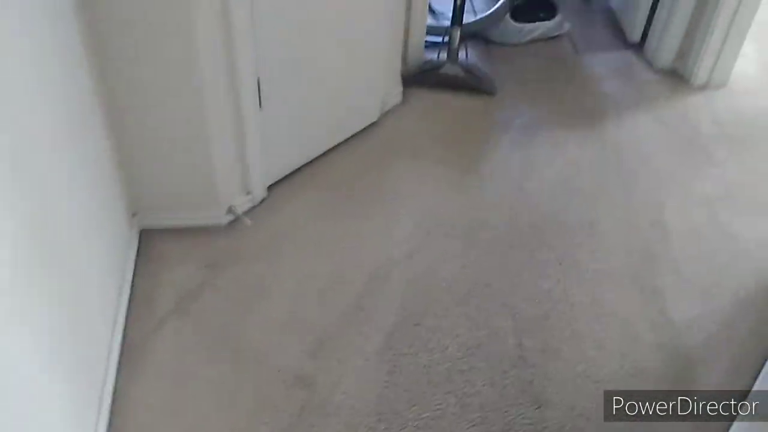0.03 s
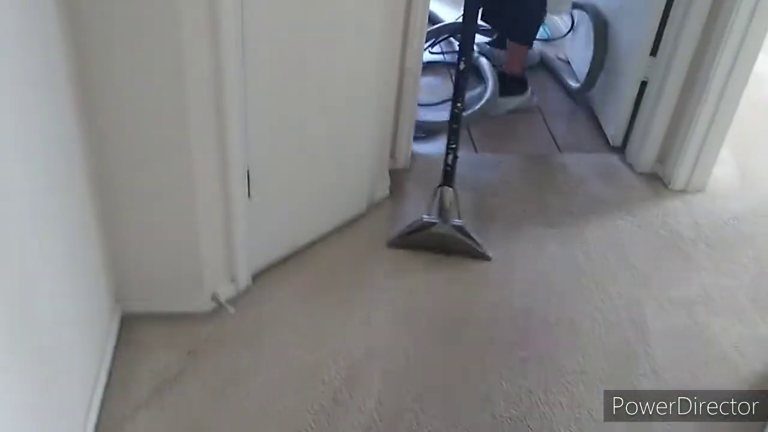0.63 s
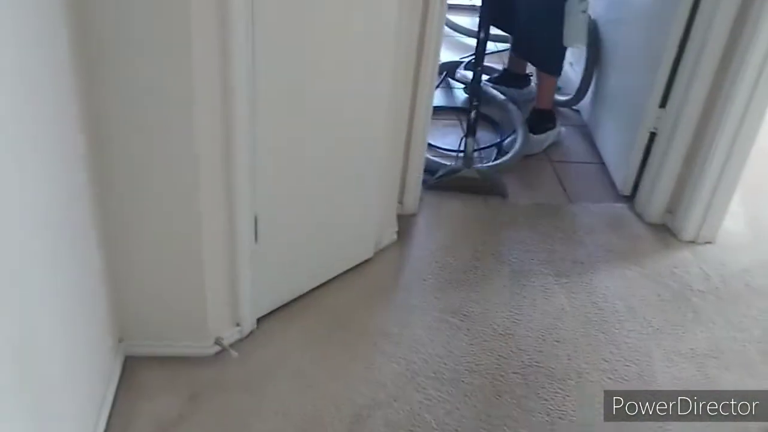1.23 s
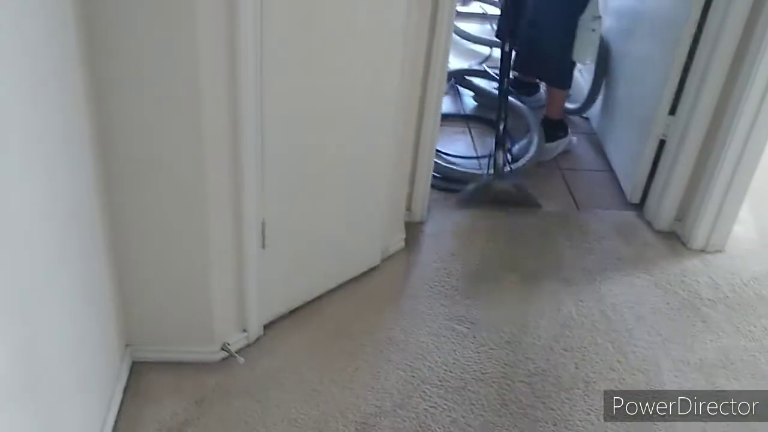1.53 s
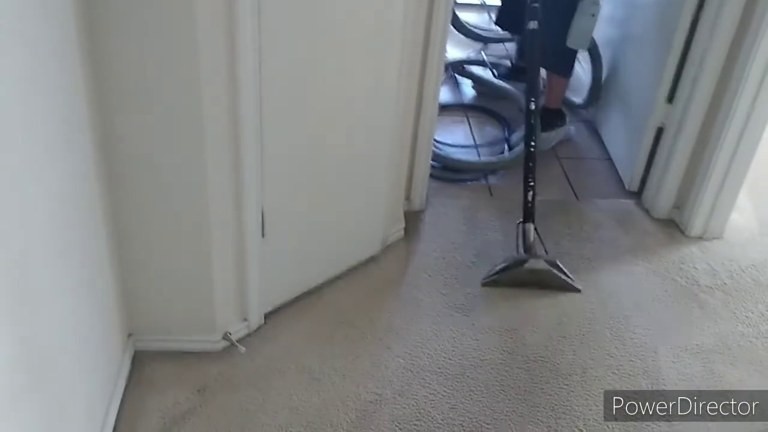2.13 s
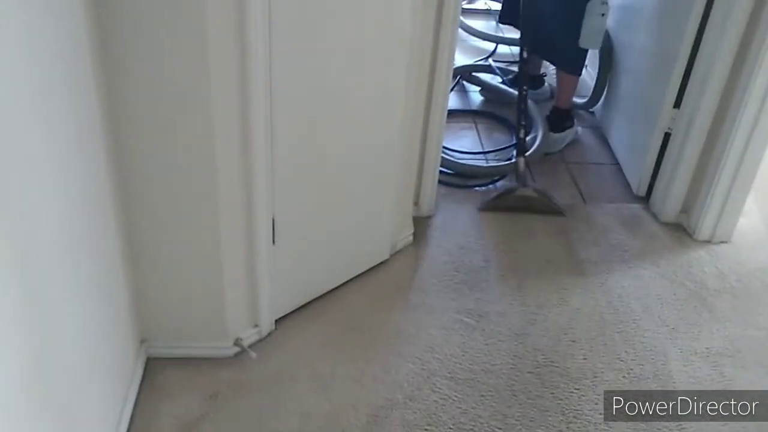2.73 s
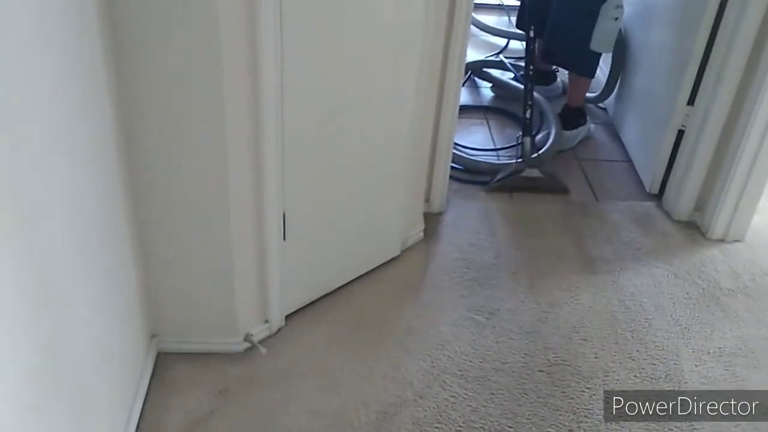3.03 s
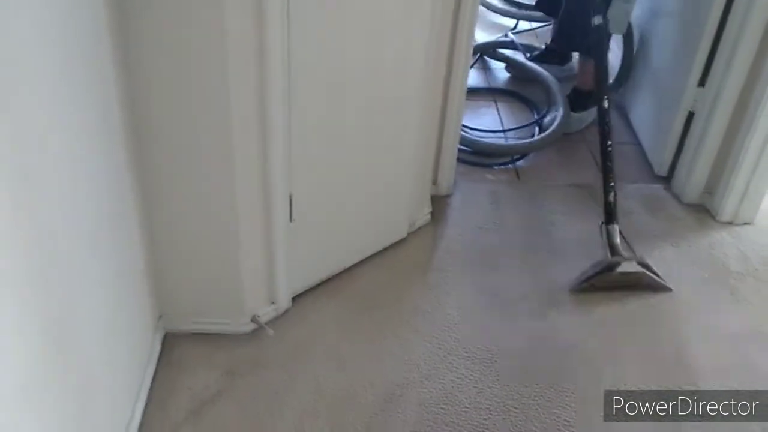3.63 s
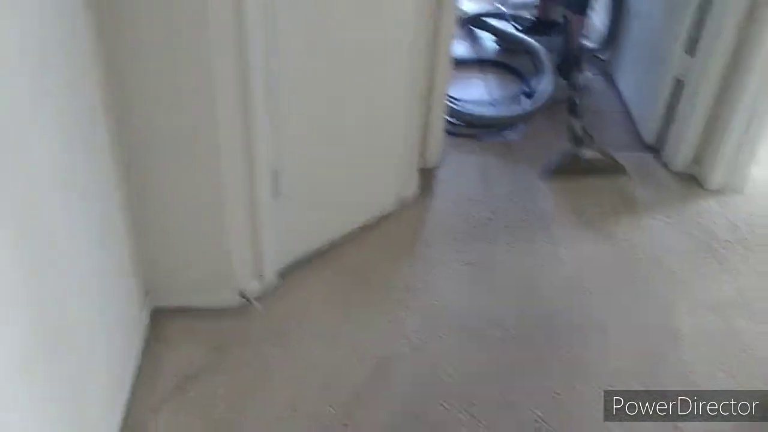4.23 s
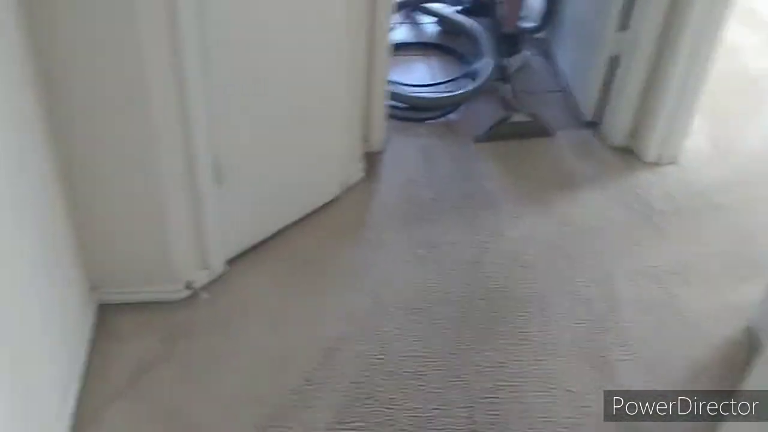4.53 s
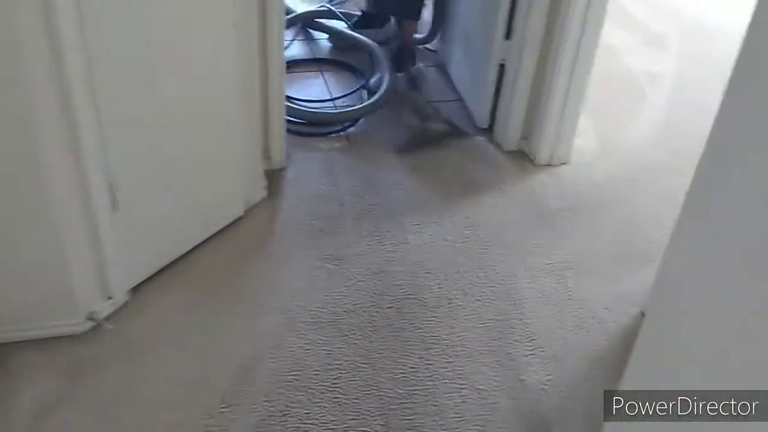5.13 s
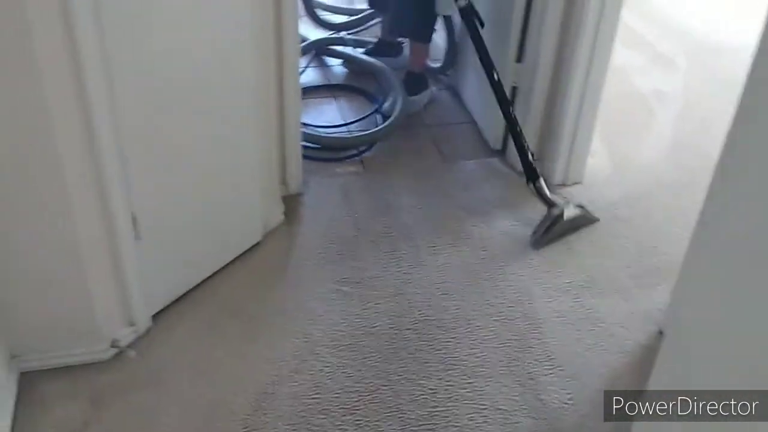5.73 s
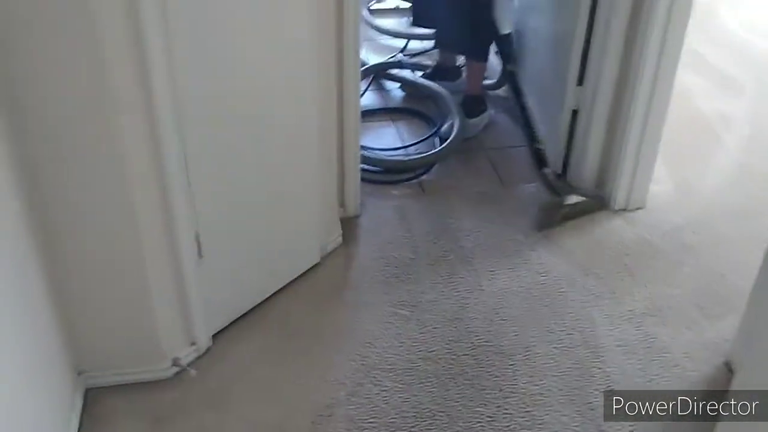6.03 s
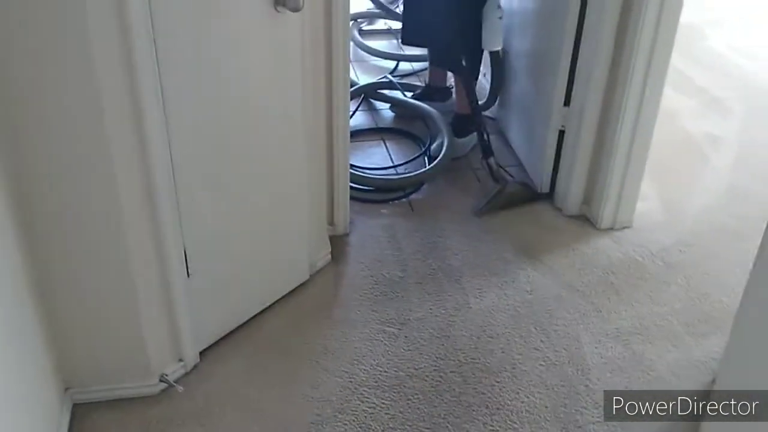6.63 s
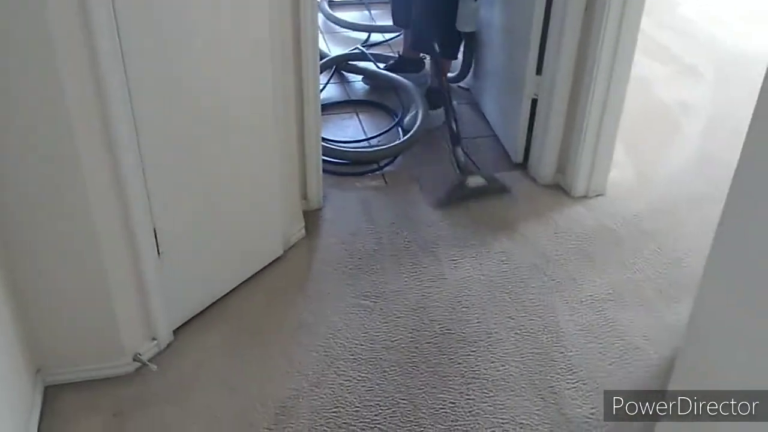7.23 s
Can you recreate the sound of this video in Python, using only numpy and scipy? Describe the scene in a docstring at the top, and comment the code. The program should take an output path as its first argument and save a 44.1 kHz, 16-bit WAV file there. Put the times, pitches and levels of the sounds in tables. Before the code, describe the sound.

Continuous rushing, hissing suction comes from a carpet cleaning wand working along an indoor hallway, with a wavering high whistle on top and a rapid low pump throb behind. Several long, smooth hissing pulls alternate with looser, sputtering air. As the strokes turn, the head scrubs wet pile, gives soft knocks and slurps water up the tube, most strongly at about one, three, five and seven seconds.

```python
"""A carpet extractor wand is pushed and pulled over a hallway carpet, heard in mono.
Air rushes and whistles into its slot, and hisses when the slot's lips seal on the pile (the fibres).
As a stroke turns, the wand scrubs wet pile, knocks, and gulps air and water, which gurgles in the tube.
Behind it, the machine's pump throbs about twenty times a second through the hose."""
import sys
import numpy as np
from scipy import signal
from scipy.fft import rfft, irfft, next_fast_len
from scipy.io import wavfile
from scipy.ndimage import map_coordinates

SR = 44100
rng = np.random.default_rng(int(sys.argv[2]) if len(sys.argv) > 2 else 0)


def wrap_up_sound(samples):
    """Save the sound to the file named by the first command line argument, as 16-bit audio."""
    columns = np.atleast_2d(samples).T
    # keep every value between -1 and 1, then stretch to whole-number steps
    tamed = np.clip(columns, -1, 1)
    steps = np.round(tamed * 32767).astype(np.int16)
    wavfile.write(sys.argv[1], SR, steps)


N = 325017

# The pump's throb. Each row: time in seconds, relative levels of the boom and the drone in dB.
PUMP_LEVELS = [(0.0, -31, -21.5), (0.08, -23.5, -27.5), (0.2, -34.5, -23), (0.37, -39, -31),
               (0.49, -28, -24.5), (0.7, -31.5, -31.5), (0.93, -38, -28), (1.06, -24.5, -28),
               (1.2, -30, -23), (1.4, -31, -31), (1.7, -32, -25.5), (2.03, -30.5, -29.5),
               (2.36, -29.5, -32.5), (2.46, -33, -27), (2.79, -36, -32), (3.04, -28, -23),
               (3.16, -23, -31.5), (3.3, -29.5, -27), (3.55, -20.5, -29.5), (3.75, -28, -29),
               (4.1, -27.5, -23.5), (4.33, -28, -25), (4.78, -25.5, -38), (4.99, -29.5, -28),
               (5.11, -39, -52), (5.4, -35, -53.5), (5.46, -33.5, -45), (5.62, -50, -39.5),
               (5.8, -44.5, -38.5), (6.08, -43.5, -36.5), (6.22, -41, -31), (6.3, -52, -33),
               (6.4, -48, -42), (6.52, -42, -43), (6.74, -51.5, -50), (6.81, -61, -39), (6.92, -60, -34),
               (6.98, -24.5, -28.5), (7.27, -47, -45), (7.37, -49, -42.5)]
# The pump's pace. Each row: time in seconds, strokes per second.
PUMP_SPEED = [(0, 20.42), (2.0, 20.45), (2.6, 20.5), (3.1, 20.36), (4.3, 20.38), (4.9, 20.27), (5.6, 20.39),
              (7.37, 20.34)]
# The pump's overtones. Each row: multiple of the stroke rate, relative level in dB.
PUMP_OVERTONES = [(1, -59), (2, -23), (3, -9.5), (4, -29), (5, -0.5), (6, 10), (7, 11), (8, 14), (9, -58),
                  (10, 4.5), (11, 0), (12, -44.5), (13, 5), (14, 6.5), (15, -51), (16, -2), (17, -32),
                  (24, -57)]

# The tone colour of each noise. Each row: frequency in Hz, relative level in dB.
RUMBLE_COLOUR = [(20, -1), (45, 3), (75, 4.5), (130, 17), (300, 11), (450, 5.5), (700, -83)]
FLUTTER_COLOUR = [(90, -46.0), (170, -2.5), (210, 0.5), (300, 1.5), (370, -6.0), (520, -43.0)]
GURGLE_COLOUR = [(250, -30), (370, 0.5), (500, 2.5), (570, -12), (700, -34), (1000, -40)]
SCRUB_COLOUR = [(60, -40), (150, -21), (330, 0), (500, 2.5), (650, -6), (950, -7), (1200, 12), (1450, 8.5),
                (1700, -4), (2200, -2), (4000, -41)]
SLURP_COLOUR = [(60, -27.5), (160, 13.5), (380, 11.5), (520, 12.5), (700, 14.5), (970, 14), (1200, 15.5),
                (1800, 18.5), (2400, 6), (4000, -3), (9000, -20)]
WHISTLE_COLOUR = [(4200, -34), (4500, -0.5), (4750, 2), (5080, 0), (5280, 7), (5450, -42)]
LIFT_COLOUR = [(4000, -38), (5600, -15), (6500, -7), (8600, 10.5), (10000, 3), (12000, -1), (15500, -7)]
RUSH_COLOUR = [(350, -48), (620, -30.5), (750, -14), (900, -2.5), (1080, -6.5), (1350, -6.5), (1700, 0.5),
               (2100, 6), (2500, 4.5), (2840, 3.5), (3080, -4.5), (3500, -35), (5400, -48)]
LEAK_COLOUR = [(2700, -53.5), (3150, 8), (3500, 5), (4000, 5.5), (4350, 4.5), (4550, -11), (4850, -29),
               (5200, 4.5), (5450, -38), (6000, -45)]
SEALED_COLOUR = [(3000, -37.5), (5450, -31), (5800, -19), (6100, -12), (6700, -5), (7300, -1.5), (8100, 0),
                 (8700, -5), (9500, -10), (10600, -14.5), (12000, -19.5), (15500, -21)]
LOOSE_COLOUR = [(3000, -52), (5700, -17), (6200, -2), (6600, 1.5), (7000, -2.5), (7500, 2), (7800, 2.5),
                (8200, 5), (8800, -0.5), (9600, -5), (10500, -9), (12000, -12.5), (15500, -16)]
# Streaks are shifting peaks and dips in air noise. Each row: frequency in Hz, factor on their depth.
STREAK_FACTORS = [(1400, 1.5), (2300, 0.43), (3500, 1.96), (8000, 1.21), (12000, 0.27)]

# Slugs of water in the tube. Each row: start in seconds, level in dB.
WATER_SLUGS = [(.125, -33), (.65, -39), (.91, -38), (1.0, -32), (1.22, -42), (1.48, -36), (1.64, -31),
               (3.22, -34), (7.08, -27)]
# The lips reach wet pile, mostly as a stroke turns. Each row: peak time in seconds, level in dB.
WET_PATCHES = [(.95, -26.5), (1.47, -31), (1.68, -31), (3.16, -26), (3.3, -25.5), (5.02, -26), (6.3, -44),
               (7.03, -22), (7.22, -34)]
# The wand's head knocks down and rebounds. Each row: start in seconds, level in dB.
HEAD_KNOCKS = [(1.331, -15.5), (1.395, -14.5), (3.003, -23), (3.064, -13), (3.106, -19), (3.163, -18.5),
               (4.955, -18), (6.288, -23), (6.785, -27), (6.936, -12), (6.975, -20)]
# The head's ringing tones. Each row: pitch in Hz, relative level in dB, seconds to fade by 60 dB.
HEAD_TONES = [(173, -8.5, 0.1), (330, -0.5, .08), (502, -4.5, 0.19), (586, -7, 0.1), (1130, -1.5, 0.12),
              (1300, -9, .09), (1820, -4, 0.11)]
# Standing waves, the tones of the flat nozzle. Each row: pitch in Hz, relative level in dB.
NOZZLE_TONES = [(1115, -11.5), (1400, -2.5), (2830, 3.5), (3140, -12), (3430, -2), (3650, -9), (4000, -9),
                (4400, -10), (4700, -5), (5100, -6), (5550, -15)]
# They sing out as the nozzle is worked along the wall. Each row: time in seconds, level in dB.
NOZZLE_LEVELS = [(5.1, -46), (5.25, -33), (5.85, -40), (6.02, -32.5), (6.75, -31), (7.1, -32)]
# The whistle's strength as the slot tilts. Each row: time in seconds, level in dB.
WHISTLE_LEVELS = [(0, -27.5), (0.4, -29), (0.56, -35), (0.74, -27), (0.88, -37), (1.02, -27), (1.23, -35),
                  (1.55, -33.5), (1.9, -29.5), (1.99, -25.5), (2.11, -32.5), (2.62, -26.5), (2.74, -28),
                  (3.04, -26), (3.2, -29.5), (3.38, -43), (3.7, -31.5), (3.88, -28.5), (4.0, -40),
                  (4.15, -31.5), (4.52, -26.5), (4.64, -31.5), (5.05, -28), (5.44, -34), (5.55, -25.5),
                  (5.8, -35), (6.14, -30.5), (6.33, -45), (6.42, -29), (6.62, -34), (7.37, -33.5)]
# The whistle's slide. Each row: time in seconds, pitch in Hz.
WHISTLE_SLIDE = [(0, 5300), (0.24, 4740), (1.05, 4714), (2.0, 4870), (2.65, 4770), (3.75, 4860),
                 (4.3, 4860), (4.58, 4630), (4.72, 4840), (5.09, 4800), (5.45, 4860), (5.56, 4750),
                 (5.68, 4630), (5.93, 4780), (6.49, 4880)]
# Two low swells of the pump's drone, then breathy hoots at the slot.
# Each row: middle and length in seconds, pitch and width in Hz, level in dB.
BREATHY_SWELLS = [(0.16, 0.42, 310, 92, -25), (1.19, 0.41, 305, 98, -29), (4.996, 0.383, 830, 99, -23),
                  (5.18, 0.64, 424.5, 19, -37.5), (5.443, 1, 886, 37, -37.5), (6.86, 0.22, 486, 106, -25)]
# A lip lifts off the carpet. Each row: start and end in seconds, level in dB.
LIP_LIFTS = [(.3, 0.563, -27.5), (1.5, 1.95, -32), (3.25, 3.68, -37), (3.675, 3.9, -22.5),
             (5.364, 5.597, -26.5), (7.281, 7.372, -32)]
# The tones of the wand's pipe. Each row: pitch and width in Hz, relative level in dB.
PIPE_TONES = [(484, 15, -22), (816, 7.2, 16), (1091, 7, 14), (1373.4, 13.7, 11.5), (1420, 48, -4),
              (1988.5, 39, 5)]
# Gulps as the slot leaves the pile. Each row: start in seconds, level in dB, rise and hold in seconds,
# seconds for its spray to fade by 60 dB, level of its hoot in dB.
SLOT_GULPS = [(0.86, -28, 0.018, 0.1, 1.7, -44), (1.313, -19, 0.01, 0.14, 0.9, -36),
              (3.063, -19, 0.0039, 0.087, 0.94, -30), (4.839, -24.5, 0.015, 0.044, 0.45, -26.5),
              (4.886, -21, 0.041, 0.11, 1.3, -27), (6.259, -27, 0.008, 0.07, 0.1, -59),
              (6.93, -20.5, 0.0065, 0.096, 0.3, -25)]
# Air leaks through gaps at the slot. Each row: time in seconds, relative level in dB.
LEAK_LEVELS = [(0.0, -29.5), (0.06, -25.5), (0.5, -25), (0.68, -29.5), (0.8, -25), (1.22, -29),
               (1.32, -24.5), (1.58, -26.5), (1.65, -30), (1.91, -26.5), (2.3, -31), (2.42, -25.5),
               (2.66, -27.5), (2.78, -25), (2.95, -27), (3.2, -28), (3.38, -30), (3.53, -26.5),
               (3.65, -30.5), (4.15, -27.5), (4.48, -29.5), (4.6, -29.5), (5.05, -28.5), (5.22, -35),
               (5.44, -44.5), (5.6, -45), (5.67, -32), (5.89, -41), (6.7, -41), (6.8, -27.5), (7.31, -36.5),
               (7.37, -29)]
# Brief clogs weaken the unsealed hiss. Each row: middle and length in seconds, change in dB.
CLOGS = [(1.246, 0.14, -2), (1.744, 0.3, -1), (5.303, 0.24, -1.5), (5.758, 0.27, -2)]
# Pulls with the lips sealed. Each row: start, end and time to seal in seconds, first and last hiss in dB.
SEALED_PULLS = [(0.778, 0.937, 0.14, -17.5, -15.5), (1.86, 2.971, 0.4, -14, -16),
                (3.684, 3.923, 0.2, -17.5, -16), (3.98, 4.848, 0.21, -19, -14.5),
                (5.82, 6.737, 0.12, -18, -14)]


def amp(db):
    """Turn decibels into a gain to multiply by."""
    return 10 ** (np.asarray(db) / 20)


def unit(x):
    """Scale a signal to an average strength (rms) of 1."""
    return x / np.sqrt(np.mean(x ** 2) + 1e-20)


def ease(u):
    """A smooth step from 0 to 1."""
    return np.sin(np.pi / 2 * np.clip(u, 0, 1)) ** 2


def swell(middle, length):
    """A smooth rise to 1 and fall back to 0, timed in seconds."""
    return ease(1 - 2 * np.abs(np.arange(N) / SR - middle) / length)


def along(points, hz):
    """Read between (frequency, value) points, giving each octave equal room."""
    freqs, values = np.transpose(points)
    return np.interp(np.log(hz + 1e-3), np.log(freqs), values)


def curves(rows):
    """Turn each column after the time into one value per sample."""
    times, *columns = np.transpose(rows)
    return [np.interp(np.arange(N) / SR, times, column) for column in columns]


def wobble(per_s):
    """A smooth curve through per_s random values a second."""
    return map_coordinates(rng.standard_normal(int(N * per_s / SR) + 4), [np.arange(N) * per_s / SR])


def filtered(x, response):
    """Scale each frequency in x by response(frequency)."""
    size = next_fast_len(N + SR // 2)
    return irfft(rfft(x, size) * response(np.fft.rfftfreq(size, 1 / SR)), size)[:N]


def coloured(x, colour):
    """Give x a tone colour, at strength 1."""
    return unit(filtered(x, lambda hz: amp(along(colour, hz))))


def turbulence(colour, streak_db, streak_hz, streak_s):
    """Even air noise with low peaks and deep dips in its tone that shift as the wand moves."""
    hz, t, spectra = signal.stft(rng.standard_normal(N), SR, nperseg=2048)
    grid = np.meshgrid(hz / streak_hz, t / streak_s, indexing="ij")
    pattern = map_coordinates(rng.standard_normal((512, 256)), grid, mode="mirror")
    streaks = 2 * (1 - np.exp(-pattern / 2))  # sound paths that add gain little; ones that cancel lose much
    depth_db = streak_db * along(STREAK_FACTORS, hz)[:, None]
    gain = amp(along(colour, hz)[:, None] + depth_db * streaks)
    gain /= np.linalg.norm(gain, axis=0)
    return unit(signal.istft(spectra * gain, SR)[1][:N])


def sputter(depth_db=1.3):
    """The uneven gain of air that drags water through an open gap."""
    return amp(depth_db * wobble(per_s=45))


def pump(strokes):
    """Each pump stroke is a low boom, with a slightly smeared drone of higher overtones alongside."""
    multiples = np.arange(1, 25)
    gains = amp(along(PUMP_OVERTONES, multiples))
    boom_phase, drone_phase = 2 * np.pi * (strokes - .29), 2 * np.pi * (strokes - .27)
    boom = unit(sum(gain * amp(0.8 * wobble(5)) * np.cos(k * boom_phase)
                    for k, gain in zip(multiples[:10], gains)))
    smears = 0.31 * rng.standard_normal(len(multiples))  # radians
    drone = unit(sum(gain * np.cos(k * drone_phase + smear + 0.33 * wobble(5.2))
                     for k, gain, smear in zip(multiples[10:], gains[10:], smears)))
    flutter = amp(-8) * coloured(rng.standard_normal(N), FLUTTER_COLOUR)
    boom_db, drone_db = curves(PUMP_LEVELS)
    throb = amp(boom_db - 1.0) * boom + amp(drone_db - 1.64) * (drone + flutter)
    # the machine itself hums steadily, and rumbles more when the booms are strong
    hum = amp(-52) * np.cos(3 * boom_phase)
    rumble = amp(-39.5 + 0.44 * (boom_db + 32.5)) * coloured(rng.standard_normal(N), RUMBLE_COLOUR)
    uneven_strokes = amp(0.7 * wobble(16))
    return uneven_strokes * throb + hum + rumble


def gurgles(rise_s=.012, fade_s=0.44):
    """Slugs of water in the tube make hollow glugs that start quickly and die away."""
    t, flow = np.arange(N) / SR, np.zeros(N)
    for start, db in WATER_SLUGS:
        fall_db = 60 * np.maximum(t - start - rise_s, 0) / fade_s
        flow += ease((t - start) / rise_s) * amp(db - fall_db)
    return flow * turbulence(GURGLE_COLOUR, streak_db=7.5, streak_hz=58.5, streak_s=.05)


def scrub(rise_db_per_s=81, fall_db_per_s=66):
    """The lips drag through wet fibres, most where water has gathered at the turn of a stroke."""
    t = np.arange(N) / SR
    swells = sum(amp(db - np.maximum(rise_db_per_s * (peak - t), fall_db_per_s * (t - peak)))
                 for peak, db in WET_PATCHES)
    steady_drag = amp(-50 + 2.0 * wobble(8.1))
    wet_noise = turbulence(SCRUB_COLOUR, streak_db=10.5, streak_hz=57.7, streak_s=.07)
    return np.hypot(swells, steady_drag) * wet_noise


def knocks(cushion_s=0.0045, splash_db=-3, splash_fade_s=0.053):
    """Blows, cushioned by the carpet, splash the wet pile and ring the wand's head."""
    t, out = np.arange(SR // 4) / SR, np.zeros(N + SR)
    wet_noise = coloured(rng.standard_normal(N), SLURP_COLOUR)
    for start_s, db in HEAD_KNOCKS:
        start, ring = round(start_s * SR), 0
        for hz, tone_db, fade_s in HEAD_TONES:
            fade = amp(tone_db + rng.normal(0, 2) - 60 * t / fade_s)
            pitch = hz * rng.normal(1, 0.019)
            ring += fade * np.sin(2 * np.pi * (pitch * t + rng.random()))
        splash = amp(splash_db - 60 * t / splash_fade_s) * wet_noise[start:][:len(t)]
        out[start:][:len(t)] += amp(db) * (ring + splash) * (1 - np.exp(-t / cushion_s))
    return out[:N]


def nozzle_ring(width_hz=73, drift=.014):
    """Air rings the nozzle's hollow tones, which slide up and down together as it rocks."""
    peaks = lambda f: sum(amp(db) / (1 + (2 * (f - hz) / width_hz) ** 2) ** 1.5
                          for hz, db in NOZZLE_TONES)
    ring = filtered(rng.standard_normal(N), peaks)
    position = np.cumsum(1 + drift * wobble(per_s=4))  # reading faster raises the pitch
    return amp(curves(NOZZLE_LEVELS)[0]) * unit(map_coordinates(ring, [position], mode="mirror"))


def whistle(width_hz=210):
    """Air through the head sounds one breathy tone, which slides as the slot tilts."""
    air = turbulence(WHISTLE_COLOUR, streak_db=4.0, streak_hz=110, streak_s=.09)
    hz, t, spectra = signal.stft(air, SR, nperseg=1024)
    pitch = np.interp(t, *np.transpose(WHISTLE_SLIDE))
    peak = 1 / np.hypot(1, 2 * (hz[:, None] - pitch) / width_hz)
    return amp(curves(WHISTLE_LEVELS)[0]) * unit(signal.istft(spectra * peak, SR)[1][:N])


def breathy_tones(slot_hz=493, slot_width_hz=75, lag_s=0.031, length_s=0.179):
    """Air hoots across the slot with every gulp and a few times more; the pump's drone swells twice."""
    out = np.zeros(N)
    gulp_hoots = [(start + rise + lag_s, length_s, slot_hz, slot_width_hz, db)
                  for start, _, rise, _, _, db in SLOT_GULPS]
    for middle, length, hz, width_hz, db in gulp_hoots + BREATHY_SWELLS:
        breath = filtered(rng.standard_normal(N), lambda f: 1 / (1 + (2 * (f - hz) / width_hz) ** 2))
        out += amp(db) * swell(middle, length) * unit(breath)
    return out


def lifted_lip(move_s=0.12):
    """A gap opens under a lifted lip, lets in a thin, bright stream of air, and closes."""
    t = np.arange(N) / SR
    flow = sum(amp(db) * ease((t - start) / move_s) * ease(1 - (t - end) / move_s)
               for start, end, db in LIP_LIFTS)
    return flow * sputter() * turbulence(LIFT_COLOUR, streak_db=2, streak_hz=117.4, streak_s=0.067)


def droplets(per_s, spread_db):
    """Water drops strike at random as tiny clicks of uneven size."""
    hits = rng.random(N) < per_s / SR
    signs = np.sign(rng.standard_normal(N))
    sizes = amp(spread_db * np.clip(rng.standard_normal(N), -2, 2))
    return unit(hits * signs * sizes)


def pipe_ring(x):
    """The wand's pipe rings at its own tones as x passes through."""
    peaks = lambda f: sum(amp(db) * 1j * f * width / (hz * hz - f * f + 1j * f * width)
                          for hz, width, db in PIPE_TONES)
    return unit(filtered(x, peaks))


def gulp_flow(fade_share, bite_db=2.5, bite_s=0.022):
    """Each gulp's inrush overshoots, settles and fades; fade_share scales its fade time."""
    t, flow = np.arange(N) / SR, np.zeros(N)
    for start, db, rise, hold, fade, _ in SLOT_GULPS:
        age = np.maximum(t - start, 0)
        overshoot_db = bite_db * np.exp(-age / bite_s)
        fall_db = 60 * np.maximum(age - hold, 0) / (fade * fade_share)
        flow += np.minimum(age / rise, 1) * amp(db + overshoot_db - fall_db)
    return flow


def gulps(deep_hz=780):
    """The seal breaks: air tears water off the lips and rattles it up the tube. The lows fade first."""
    drops = droplets(per_s=400, spread_db=3)
    churn = turbulence(SLURP_COLOUR, streak_db=7.0, streak_hz=90.6, streak_s=.04)
    slurp = unit(coloured(drops, SLURP_COLOUR) + 2.1 * churn + .85 * pipe_ring(drops))
    deep = filtered(slurp, lambda hz: 1 / (1 + (hz / deep_hz) ** 10))
    return gulp_flow(fade_share=0.8) * (slurp - deep) + gulp_flow(fade_share=0.72) * deep


def seal(release_s=0.3):
    """How tightly the lips grip the pile (0 to 1), and the strength of their hiss along each pull."""
    t, total_grip, power = np.arange(N) / SR, np.zeros(N), np.zeros(N)
    for start, end, seal_s, first_db, last_db in SEALED_PULLS:
        grip = ease((t - start) / seal_s) * ease(1 - (t - end) / release_s)
        total_grip += grip
        power += grip * amp(np.interp(t, [start, end], [first_db, last_db])) ** 2
    return np.clip(total_grip, 0, 1), np.sqrt(power)


def suction(rush_db=-23, loose_db=-21, spray_db=-9.5):
    """Air rushes through the wand's head, leaks in at the slot and hisses past the lips."""
    leak_db, = curves(LEAK_LEVELS)
    opening_db = leak_db - leak_db.mean()
    grip, hiss = seal()
    rush = amp(rush_db + 0.17 * opening_db + 0.89 * wobble(9))
    rush *= turbulence(RUSH_COLOUR, streak_db=5.0, streak_hz=84.93, streak_s=.11)
    leak = turbulence(LEAK_COLOUR, streak_db=4.6, streak_hz=135, streak_s=.1)
    leak *= amp(leak_db + 0.5 + 0.53 * wobble(7.1))
    # a tight seal gives a loud smooth hiss, a loose one a weaker, hollow one; gulps add spray
    spray = amp(spray_db) * gulp_flow(fade_share=1)
    tight = np.hypot(hiss, spray)
    tight *= turbulence(SEALED_COLOUR, streak_db=4.5, streak_hz=80.24, streak_s=.1)
    clog_db = sum(db * swell(middle, length) for middle, length, db in CLOGS)
    loose = amp(loose_db + 0.421 * opening_db + clog_db) * np.sqrt(1 - grip)
    loose *= turbulence(LOOSE_COLOUR, streak_db=7.5, streak_hz=119.28, streak_s=.13)
    uneven_pile = amp(0.29 * wobble(6.7) + 0.68 * wobble(28))
    return rush + leak + uneven_pile * (tight + sputter() * loose)


def scene():
    """Wand and pump together; the air flow pulses slightly with the pump."""
    pump_strokes = np.cumsum(curves(PUMP_SPEED)[0]) / SR
    pulsing = amp(0.64 * np.cos(2 * np.pi * (pump_strokes - .6)))
    air = pulsing * (suction() + whistle() + nozzle_ring() + lifted_lip())
    mono = air + scrub() + breathy_tones() + gulps() + gurgles() + knocks() + pump(pump_strokes)
    return np.array([mono, mono])


def record(dry, ceiling=.92, top_hz=15600):
    """Round off the highest peaks and cut everything above top_hz."""
    rounded = dry / (1 + np.abs(dry / ceiling) ** 8) ** (1 / 8)
    return np.array([filtered(channel, lambda hz: hz < top_hz) for channel in rounded])


dry = scene()
out = record(dry)
wrap_up_sound(out)
```